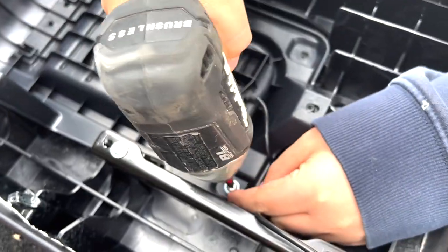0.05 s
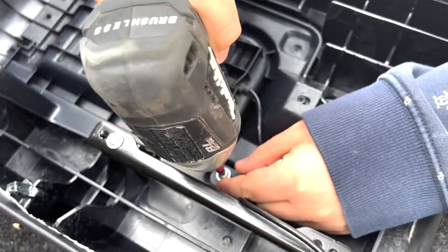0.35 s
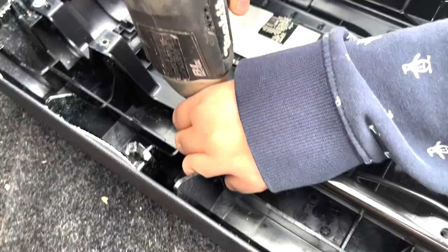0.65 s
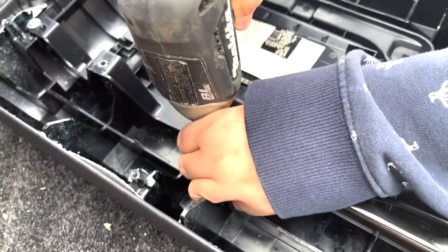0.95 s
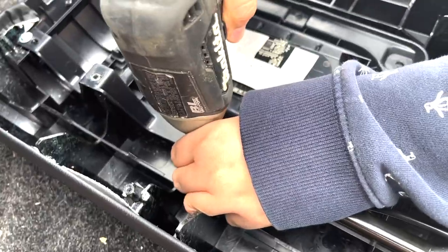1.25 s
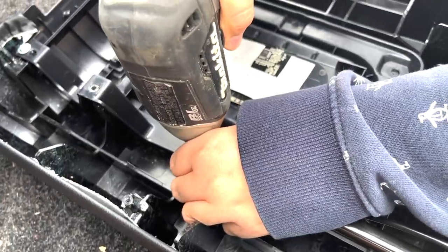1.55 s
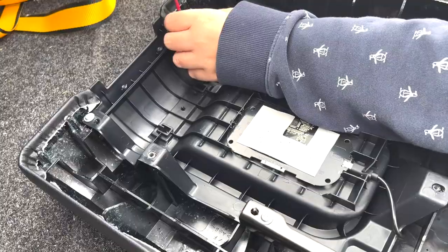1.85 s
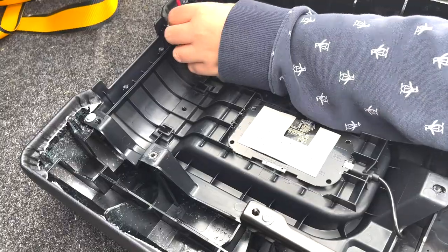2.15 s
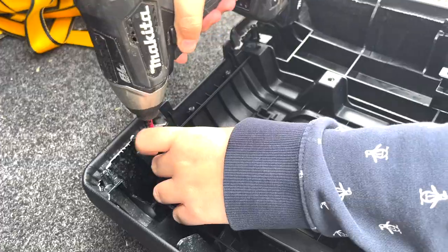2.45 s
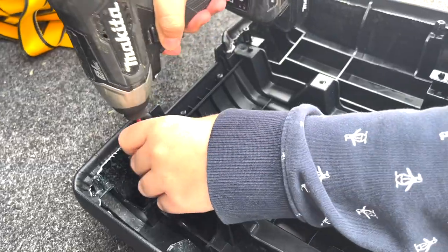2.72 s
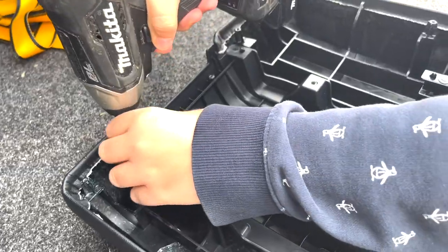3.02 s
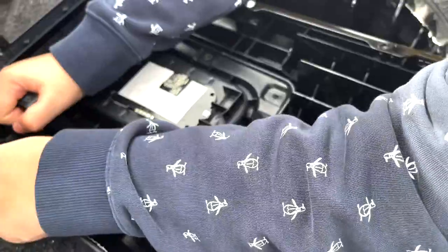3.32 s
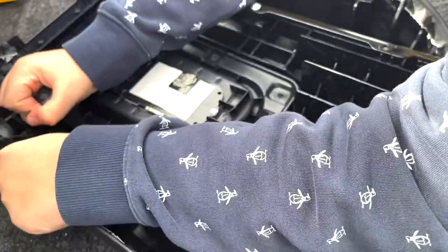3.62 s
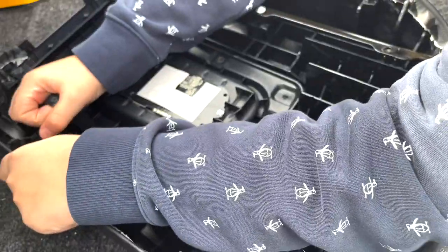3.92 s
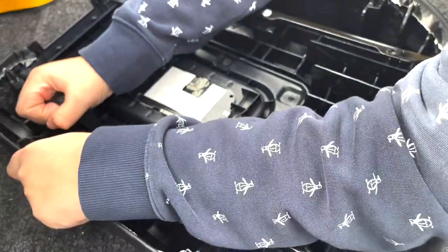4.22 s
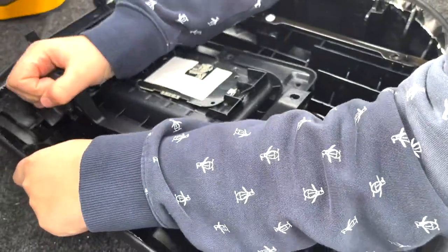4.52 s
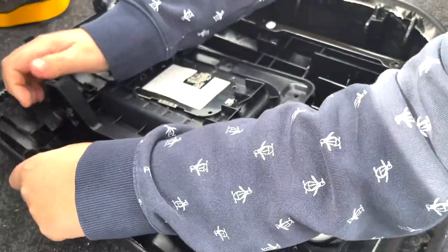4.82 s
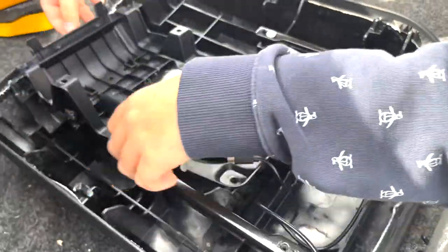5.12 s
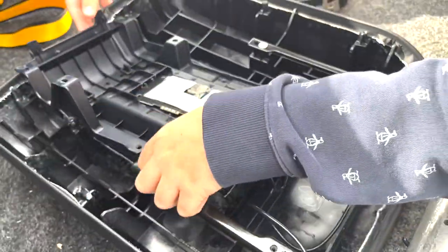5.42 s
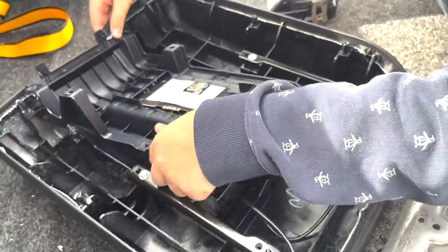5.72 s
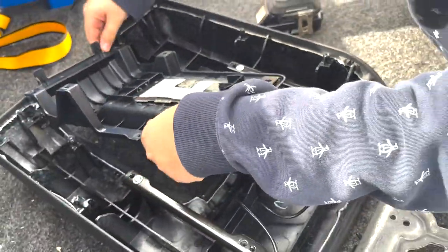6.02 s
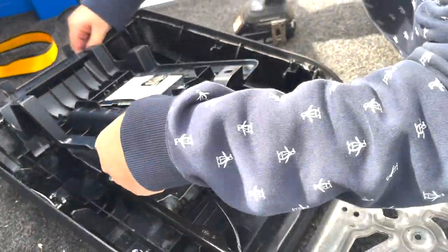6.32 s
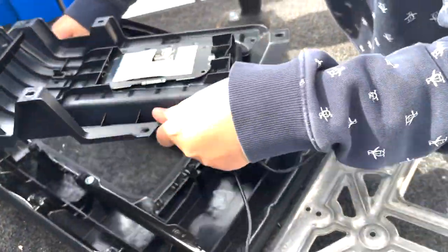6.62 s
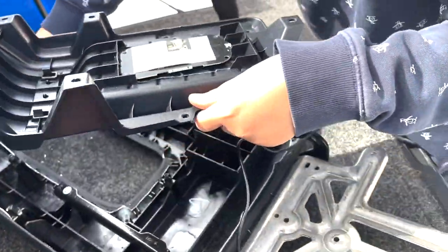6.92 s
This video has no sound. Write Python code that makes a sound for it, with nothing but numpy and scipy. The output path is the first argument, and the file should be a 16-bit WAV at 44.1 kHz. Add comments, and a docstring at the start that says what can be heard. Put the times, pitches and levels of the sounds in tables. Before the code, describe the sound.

A hard plastic panel is unscrewed from a moulded shell lying on carpet, heard close up and slightly to the left. Brief, gritty bursts from a cordless driver mix with clicks and dull bumps of flexing plastic. The driver stops, and a moment later the panel lets go with a quick cluster of cracks and a knock. Light ticks and soft rubbing trail off above a low background rumble.

```python
'''Unscrewing a plastic cover

A hard plastic cover is unscrewed and lifted out of a moulded shell on carpet, near a stereo microphone.
A cordless driver rasps in short runs, and bending waves in the flexing shell give dull thumps.
Edges click, drag and squeak; the cover lets go with a clatter that excites the modes of the shell.
Afterwards there is only faint rubbing and ticking over a low rumble.'''
import sys
import numpy as np
from scipy import signal
from scipy.fft import rfft, irfft, next_fast_len
from scipy.io import wavfile

SR = 44100
rng = np.random.default_rng(int(sys.argv[2]) if len(sys.argv) > 2 else 0)


def unload_wav(signal):
    """Save mono or channel-first audio to the path in sys.argv[1] as 16-bit WAV at rate SR, clipped to [-1, 1]."""
    wavfile.write(
        sys.argv[1],
        SR,
        np.round(np.clip(np.atleast_2d(signal).T, -1, 1) * 32767).astype(np.int16),
    )


N = 315756
TIME = np.arange(N) / SR

# Spectrum of rasping plastic. Each row: frequency in Hz, relative spectral density in dB.
RASP_SPECTRUM = [(220, 1), (420, 6), (580, 0), (730, 6), (950, 0), (1300, 3), (2000, -2), (2900, -0.5),
                 (4100, -6.5), (5300, -3), (6900, -10.5), (8700, -6.5), (11200, -4), (13000, -23),
                 (14200, -55.5)]


def from_db(db):
    """Amplitude grows tenfold for every 20 dB."""
    return 10 ** (np.asarray(db) / 20)


def unit_rms(x):
    """Normalisation to a mean power of 1."""
    return x / np.sqrt(np.mean(x ** 2) + 1e-20)


def at_hz(points, hz):
    """Interpolation on a logarithmic frequency axis."""
    knots, values = np.transpose(points)
    return np.interp(np.log(np.maximum(hz, 1)), np.log(knots), values)


def fade(t, t60):
    """Exponential decay, by 60 dB in t60 seconds."""
    return np.exp(-np.log(1000) * t / t60)


def add(out, start, sound):
    """Superposition: a sound joins the mix at its start in seconds."""
    at = max(round(start * SR), 0)
    out[:, at:at + sound.shape[-1]] += sound[..., :N - at]


def wander(x, step):
    """Random modulation: straight lines join Gaussian values one step apart along x."""
    place = (x - x[0]) / step
    values = np.random.default_rng(rng.integers(2 ** 31)).standard_normal(int(place[-1]) + 2)
    return np.interp(place, np.arange(len(values)), values)


def noise(spectrum, size, ripple_db=0, coherence=None):
    """Partly coherent stereo noise of rms 1; spectral ripple stands for closely spaced resonances."""
    # Sounds near the microphone. Each row: frequency in Hz, left-right correlation.
    near_coherence = [(60, 0.99), (300, 0.74), (700, 0.69), (2800, 0.53), (7000, .6), (8300, 1)]
    padded = next_fast_len(size)
    hz = np.fft.rfftfreq(padded, 1 / SR)
    mid, side = np.exp(2j * np.pi * rng.random((2, len(hz))))
    alike = at_hz(near_coherence if coherence is None else coherence, hz)
    pair = np.sqrt(1 + alike) * mid + np.sqrt(1 - alike) * side * [[1], [-1]]
    gain = from_db(at_hz(spectrum, hz) + ripple_db * wander(np.sqrt(hz), 1))
    return unit_rms(irfft(pair * gain, padded)[:, :size])


def split_bands(x, body_hz=1400, treble_hz=6500):
    """Complementary filters divide a sound into body, middle and treble."""
    hz = np.fft.rfftfreq(x.shape[-1], 1 / SR)
    body, below_treble = [irfft(rfft(x) / (1 + (hz / edge) ** 6), x.shape[-1])
                          for edge in (body_hz, treble_hz)]
    return body, below_treble - body, x - below_treble


def scatter(spells, spread_db=2.5):
    """Jittered timing spreads contacts through each spell; each has a start in s and a level in dB."""
    contacts = []
    for start, end, per_s, level_db in spells:
        jitter, strength = rng.random((64, 2)).T
        times = start + (np.arange(len(jitter)) + jitter) / per_s
        levels_db = level_db + spread_db * (2 * strength - 1)
        contacts += [(s, db) for s, db in zip(times, levels_db) if s < end]
    return contacts


def rumble(ambience_db=-46, flutter_db=6):
    """Amplitude modulation: the bass of a dull ambience swells and sinks as hands and shell move."""
    # Each row: frequency in Hz, relative spectral density in dB.
    spectrum = [(25, -31), (48, 0), (110, 0.5), (190, -10), (330, -20.5), (750, -23), (1500, -30),
                (3000, -40.5), (11000, -66.5), (13000, -72.5)]
    # Each row: frequency in Hz, left-right correlation.
    coherence = [(50, 0.83), (2000, 0.41)]
    # Each row: time in seconds, bass gain in dB.
    sway = [(.7, 4), (1.8, 10.5), (3.1, 6.5), (4.05, -5.5), (4.5, 6.5), (6.05, -2.5), (6.7, 2)]
    ambience = from_db(ambience_db) * noise(spectrum, N, coherence=coherence)
    bass = signal.sosfiltfilt(signal.butter(2, 250, fs=SR, output="sos"), ambience)
    swell = from_db(np.interp(TIME, *np.transpose(sway)) + flutter_db * wander(TIME, 0.044))
    return ambience + (swell - 1) * bass


def rubbing(resting_db=-67.5, gain_db=-1.5, grain_db=3, speed_power=0.41, catches_per_s=35, catch_db=3):
    """Sliding friction: sleeve and fingers hiss on plastic, louder with speed, crackling as they catch."""
    # Each row: frequency in Hz, relative spectral density in dB.
    spectrum = [(700, 11.5), (1500, 5), (4000, -2), (9000, -2), (11300, 0), (13000, -42.5)]
    # Each row: start, fastest moment and end in seconds, relative level in dB.
    strokes = [(0, 0.063, 0.27, -51.5), (0.403, 0.504, 0.6, -50), (0.77, 0.815, 0.88, -54),
               (1.619, 1.8, 2.36, -55), (2.429, 2.802, 2.95, -55), (3.162, 3.237, 3.36, -48),
               (3.649, 3.766, 3.725, -46.5), (4.238, 4.275, 4.37, -31.5), (4.405, 4.428, 4.53, -44),
               (4.639, 4.746, 4.82, -49), (5.19, 5.377, 5.42, -49), (5.56, 5.602, 5.88, -57),
               (6.458, 6.584, 6.8, -52.5)]
    out = from_db(resting_db) * noise(spectrum, N)  # the hands are never quite still
    t = TIME[:SR]
    for start, fastest, end, level_db in strokes:
        speed = np.interp(start + t, [start, fastest, end], [0, 1, 0])
        travel = np.interp(start + t, [start, end], [0, np.pi / 2])  # the colour changes along the way
        hiss = sum(share * noise(spectrum, len(t), ripple_db=5)
                   for share in (np.cos(travel), np.sin(travel)))
        catches = (rng.random(len(t)) < catches_per_s / SR) * rng.random(len(t))
        crackle = from_db(catch_db) * signal.lfilter([1], [1, -fade(1 / SR, t60=0.016)], catches + 1e-18)
        level = from_db(level_db + gain_db + grain_db * wander(t, 0.0044))
        add(out, start, level * speed ** speed_power * (1 + crackle) * hiss)
    return out


def thumps(gain_db=2.5, lowest_hz=63, db_per_octave=25):
    """Dispersion: high bending waves travel faster, so a thump sweeps down; rib reflections blur it."""
    # The shell flexes. Each row: time in seconds, relative peak level in dB.
    flexes = [(0.124, -12.5), (0.293, -12.5), (0.434, -21), (0.486, -22), (0.601, -21), (0.978, -15),
              (1.026, -22), (1.125, -32), (1.231, -29), (1.262, -24.5), (1.68, -23.5), (1.705, -17),
              (1.728, -23), (1.981, -17.5), (2.007, -17.5), (2.042, -19.5), (2.079, -15.5), (2.208, -20.5),
              (2.358, -27), (2.482, -28), (2.576, -28), (2.785, -22.5), (1.447, -27.5), (4.34, -22.5),
              (2.827, -24.5), (3.176, -27), (3.786, -26), (3.816, -20)]
    # Spells of lighter bumps. Each row: start and end in seconds, bumps per second, relative peak in dB.
    bumping = [(0.122, .7, 15.2, -27), (1.62, 2.25, 20.1, -26), (2.3, 3.25, 12, -32.5),
               (5.5, 5.798, 10.8, -34)]
    out, t = np.zeros((2, N)), TIME[:SR // 4]
    hz = np.fft.rfftfreq(len(t), 1 / SR) + 1e-3
    window = np.minimum(t / .002, 1) * (1 - t / t[-1])
    lead_s = .005  # room for the earliest arrivals
    for start, level_db in list(flexes) + scatter(bumping):
        top_hz = 418 * 2 ** ((level_db + 22.5) / db_per_octave)  # a harder thump reaches higher
        push = hz ** -.5 / np.sqrt((1 + (lowest_hz / hz) ** 4) * (1 + (hz / top_hz) ** 8))
        dispersion = np.exp(-2j * np.pi * (rng.uniform(.1, .28) * np.sqrt(hz) + lead_s * hz))
        path_gains, path_delays = rng.uniform(-.6, .6, 4), rng.uniform(-.004, .014, 4)
        paths = 1 + path_gains @ np.exp(-2j * np.pi * np.outer(path_delays, hz))
        phase_turn = np.exp(2j * np.pi * rng.random())
        wave = irfft(push * dispersion * paths * phase_turn, len(t)) * window
        add(out, start - lead_s, from_db(level_db + gain_db) * wave / np.abs(wave).max())
    return out


def driver(coast_s=0.0061, grain_db=2.5, bite_db=13, dig_db=6, tail_db=-28, resonance_db=4):
    """Friction and resonance: screw and gears rasp as the driver spins up, digs in and coasts down."""
    # Each row: start, full pressure and release in seconds, run-down T60 in seconds, level in dB,
    # body and treble offsets in dB, lower and upper resonance in Hz.
    runs = [(0.21, 0.243, 0.378, 0.08, -18.8, -0.5, 3.5, 1240, 5110),
            (0.962, 0.987, 0.99, 0.1, -25, -1, -6, 1350, 3600),
            (1.251, 1.274, 1.414, 0.085, -26.5, -5.5, -2, 3500, 6000),
            (1.775, 1.79, 1.895, 0.08, -27, -1, 2, 1730, 8500),
            (2.121, 2.131, 2.217, 0.13, -32, -3.5, 0, 2730, 8810),
            (2.608, 2.617, 2.714, 0.085, -24.5, -2, 0, 1730, 3990),
            (2.936, 2.98, 3.058, 0.11, -23, 1, 1.5, 856, 8800)]
    out = np.zeros((2, N))
    for start, full, release, run_down, level_db, body_db, treble_db, low_hz, high_hz in runs:
        t = start + TIME[:SR // 2]
        onset = np.minimum((t - start) / .002, 1)
        pressure = onset * from_db(np.interp(t, [start, full], [level_db - bite_db, level_db]))
        since_release = np.logaddexp(0, (t - release) / coast_s) * coast_s
        decay = fade(since_release, run_down) + from_db(tail_db) * fade(since_release, t60=0.2)
        envelope = pressure * decay * from_db(grain_db * wander(t, 0.0016))
        depth_db = body_db + np.interp(t, [start, release], [-dig_db, dig_db / 2])
        rasp = noise(RASP_SPECTRUM, len(t), ripple_db=3.2)
        for hz in (low_hz, high_hz):
            rasp = rasp + from_db(resonance_db) * signal.lfilter(*signal.iirpeak(hz, Q=22, fs=SR), rasp)
        body, middle, treble = split_bands(unit_rms(rasp))
        add(out, start, envelope * (from_db(depth_db) * body + middle + from_db(treble_db) * treble))
    return out


def squeaks(gain_db=6, pitch_jitter=0.14):
    """Stick-slip oscillation: for a moment the slips fall into step and make a rough, gliding tone."""
    # Each row: start and length in seconds, first and last pitch in Hz, relative level in dB.
    glides = [(0.223, 0.022, 2392, 3303, -22.5), (2.953, 0.026, 2396, 3400, -28.5),
              (5.418, 0.021, 765, 785, -39)]
    out = np.zeros((2, N))
    for start, length, first_hz, last_hz, level_db in glides:
        t = TIME[:int(length * SR)]
        pitch = np.linspace(first_hz, last_hz, len(t)) * (1 + pitch_jitter * wander(t, 0.00099))
        tone = np.sin(2 * np.pi * np.cumsum(pitch) / SR)
        add(out, start, from_db(level_db + gain_db) * np.sin(np.pi * t / length) * tone)
    return out


def shell_ring(t, contact_hz, damping, spread_db):
    """Modal decay after a blow: a soft contact barely excites high modes; each spot weights them anew."""
    # Each row: frequency in Hz, relative level in dB, T60 in seconds before division by the damping.
    modes = [(121.4, -20, 0.24), (184.4, -19, 0.37), (271, -12, 0.08), (350, -6.5, .08), (474, -3, 0.079),
             (428, 1, 0.055), (580, 2, 0.024), (717, -1, 0.071), (881, -3, 0.093), (1280, -2, 0.067),
             (1620, -8.5, 0.042), (1748, 5, .06), (2000, -4.5, 0.12), (2660, -8.5, 0.12)]
    hz, level_db, t60 = np.transpose(modes)[:, :, None]
    strength = from_db(level_db + spread_db * rng.standard_normal(hz.shape))
    strength /= np.sqrt(1 + (hz / contact_hz) ** 6)
    phase = 2 * np.pi * rng.random(hz.shape)
    ring = np.sum(strength * np.sin(2 * np.pi * hz * t + phase) * fade(t, t60 / damping), axis=0)
    ring *= 1 - np.exp(-t * contact_hz)
    return ring / np.abs(ring).max()


def clicks(crack_db=-6, tail_db=-23, ring_db=-11, body_loss=0.91):
    """Hard impact: a broadband crack, quickest in the treble, with a weak tail and the shell's ring."""
    # Each row: start in seconds, relative level in dB, brightness in dB.
    contacts = [(0.3407, -11, -3.5), (0.39, -18, -5.5), (0.4757, -26, 1.5), (0.511, -22.5, -11),
                (0.5395, -19, -3), (0.5614, -28, -8), (0.6524, -31.5, -8), (1.014, -17.5, 0.5),
                (1.421, -28.5, 14.5), (1.7695, -28, -1.5), (1.7842, -6.5, 6), (2.2029, -16, -1),
                (2.2274, -22, 1.5), (2.3104, -29.5, -0.5), (2.6131, -4.5, 4), (2.9362, -25, 1),
                (2.9968, -7, 1.5), (3.048, -15, -2), (3.1442, -27.5, -3), (3.4422, -39.5, -9.5),
                (3.5588, -47.5, -17), (3.6096, -41.5, -21.5), (3.7773, -38.5, 1), (4.246, -6.5, 3.5),
                (4.2614, -5, -2), (4.2988, -5.5, -3.5), (4.4148, -22, 0.5), (4.4291, -13.5, 2.5),
                (4.7107, -35, 18), (4.8332, -26, 1), (5.0517, -44, 23.5), (5.1117, -36, -13),
                (5.143, -47.5, 17), (5.5075, -36, -8.5), (5.5268, -30.5, -8), (5.8822, -47, -3),
                (6.413, -44.5, -4), (6.7087, -44, 3), (6.836, -34, -2)]
    # Edges catch in spells. Each row: start and end in seconds, ticks per second, relative level in dB.
    ticking = [(3.2, 3.8, 8.6, -47.5), (4.55, 5.2, 6.85, -46.5), (5.45, 6.05, 9, -48)]
    # Each row: frequency in Hz, relative spectral density in dB.
    spectrum = [(200, -4.5), (500, 9), (1100, 1.5), (1700, 3.5), (4200, -4.5), (5400, -3), (6800, -8.5),
                (8500, -2.5), (11000, 1.5), (13000, -24), (16000, -46)]
    rise_s, crack_t60 = (.0018, .001, .0007), (.05, .03, .022)  # body, middle, treble
    out, t = np.zeros((2, N)), TIME[:SR // 4]
    tail = from_db(tail_db) * fade(t, t60=0.18)
    ticks = [(start, level_db, 0) for start, level_db in scatter(ticking)]
    for start, level_db, brightness_db in list(contacts) + ticks:
        body_db = -body_loss * brightness_db  # a brighter click has less body
        bands = split_bands(noise(spectrum, len(t), ripple_db=4.5))
        for band, band_db, rise, t60 in zip(bands, (body_db, 0, brightness_db), rise_s, crack_t60):
            envelope = (fade(t, t60) + tail) * (1 - np.exp(-t / rise))
            crack = unit_rms(band * envelope) * np.sqrt(np.mean(envelope ** 2))
            add(out, start, from_db(level_db + band_db + crack_db) * crack)
        ring = shell_ring(t, contact_hz=3000, damping=1.3, spread_db=4.5)
        add(out, start, from_db(level_db + body_db / 2 + ring_db) * ring)
    return out


def dragging_edges(grain_db=3, body_db=-9):
    """Irregular stick-slip: an edge drags in small jerks, ever harder, then snaps free or eases off."""
    # Each row: start and end in seconds, final relative level in dB, build-up in dB, T60 in seconds.
    drags = [(1.595, 1.6216, -21, 9.5, 0.0099), (5.773, 5.782, -47.5, 3, 0.054),
             (6.8, 6.846, -43, 11.5, 0.17)]
    out = np.zeros((2, N))
    for start, end, level_db, build_db, stop_t60 in drags:
        t = start + TIME[:SR // 4]
        force_db = np.interp(t, [start, end], [level_db - build_db, level_db])
        envelope = from_db(force_db + grain_db * wander(t, 0.00148))
        envelope *= fade(np.maximum(t - end, 0), stop_t60)
        body, middle, treble = split_bands(noise(RASP_SPECTRUM, len(t), ripple_db=2.5))
        add(out, start, envelope * (from_db(body_db) * body + middle + treble))
    return out


def knocks():
    """Soft, heavy impact: the whole cover bumps against the shell and excites its low modes."""
    # Each row: start in seconds, peak level in dB, cutoff frequency of the contact in Hz.
    blows = [(2.616, -23.5, 446), (3.023, -6.5, 522), (4.284, -3.5, 540), (4.3, -11.5, 555),
             (4.432, -18.5, 260), (4.473, -25, 129), (4.735, -28, 197)]
    out, t = np.zeros((2, N)), TIME[:SR // 2]
    for start, peak_db, contact_hz in blows:
        add(out, start, from_db(peak_db) * shell_ring(t, contact_hz, damping=1.25, spread_db=3.5))
    return out


def scene():
    """Level difference: the work lies nearer the left microphone port, which gets more midrange."""
    # Each row: frequency in Hz, left minus right level in dB.
    balance = [(300, .3), (700, 4), (1250, 5.5), (4400, 3), (8300, 0)]
    work = clicks() + knocks() + thumps() + driver() + dragging_edges() + rubbing() + squeaks()
    size = next_fast_len(N + SR // 10)
    lean_db = at_hz(balance, np.fft.rfftfreq(size, 1 / SR))
    channel_gains = from_db(lean_db / 2 * np.array([[1], [-1]]))
    return irfft(rfft(work, size) * channel_gains, size)[:, :N] + rumble()


def record(dry, port_hz=10200, low_cut_hz=34, ceiling=.88, high_cut_hz=16200):
    """Port resonance turns the left treble's phase; the microphone limits the band and rounds peaks."""
    _, poles = signal.iirpeak(port_hz, Q=5.5, fs=SR)
    left = signal.lfilter(poles[::-1], poles, dry[0])  # all-pass
    low_cut = signal.butter(2, low_cut_hz, "high", fs=SR, output="sos")
    pair = signal.sosfilt(low_cut, np.array([left, dry[1]]))
    rounded = pair / (1 + (pair / ceiling) ** 8) ** (1 / 8)
    return signal.sosfilt(signal.ellip(10, .1, 80, high_cut_hz, fs=SR, output="sos"), rounded)


dry = scene()
out = record(dry)
unload_wav(out)
```